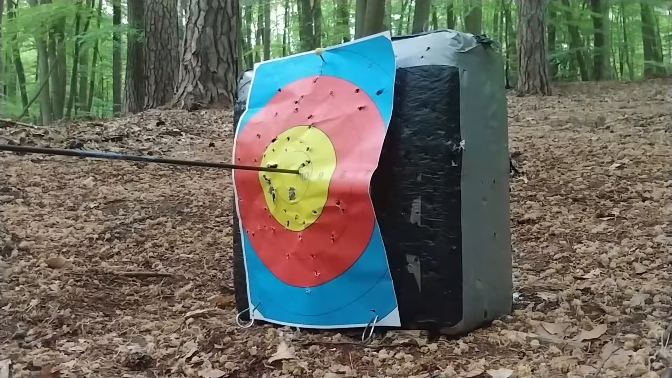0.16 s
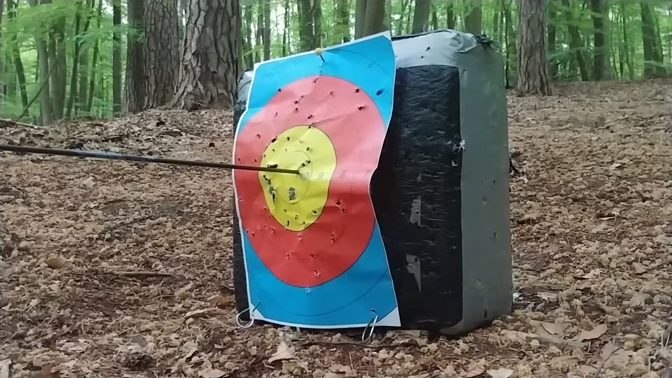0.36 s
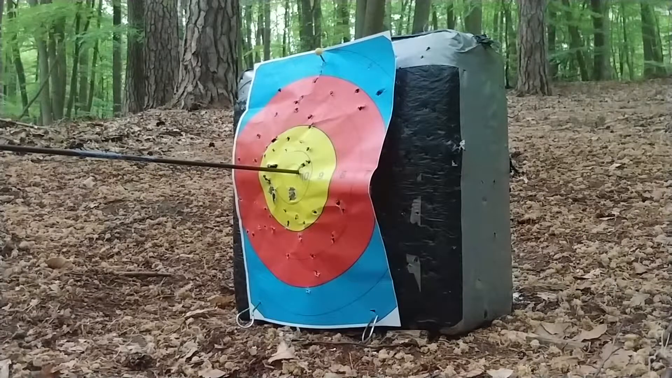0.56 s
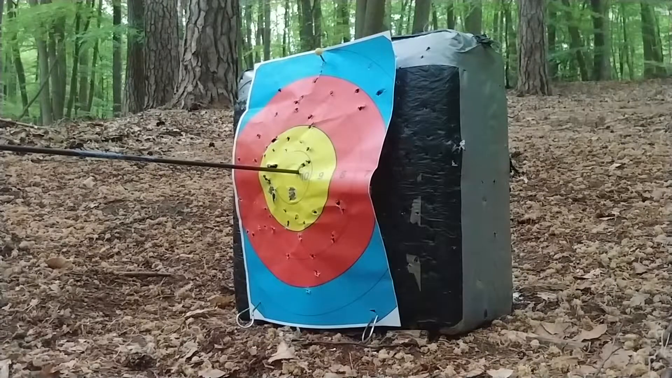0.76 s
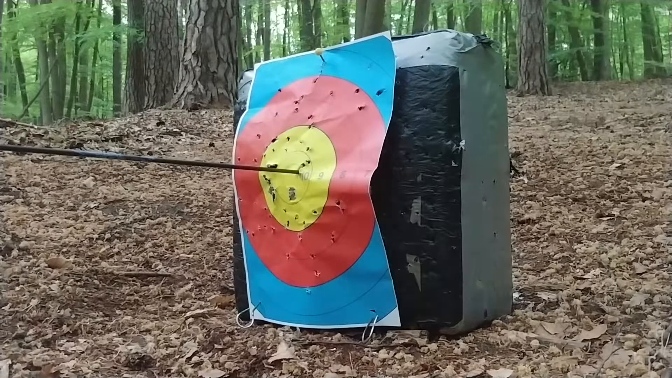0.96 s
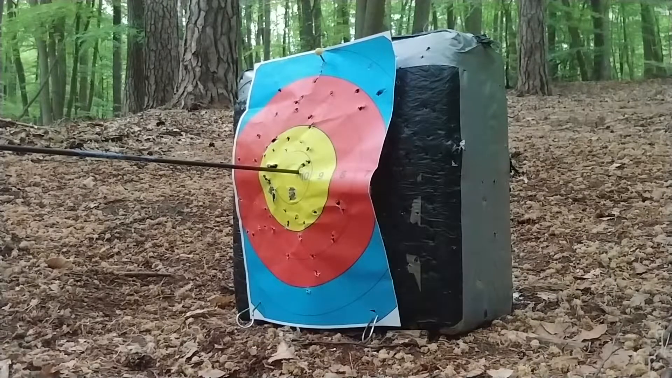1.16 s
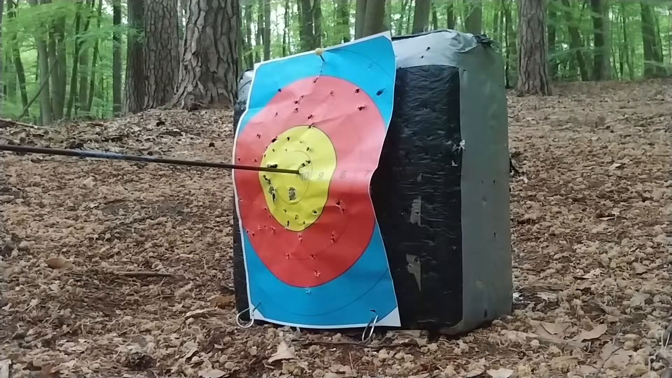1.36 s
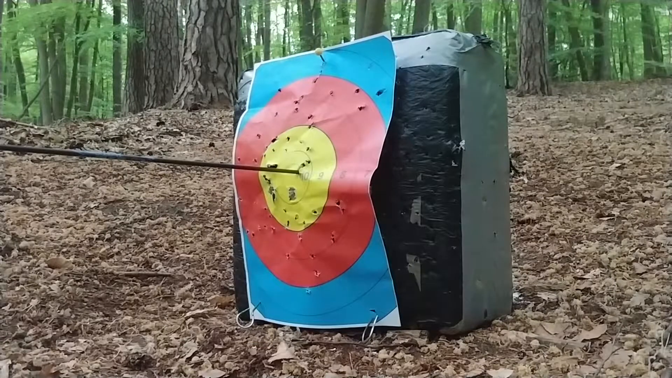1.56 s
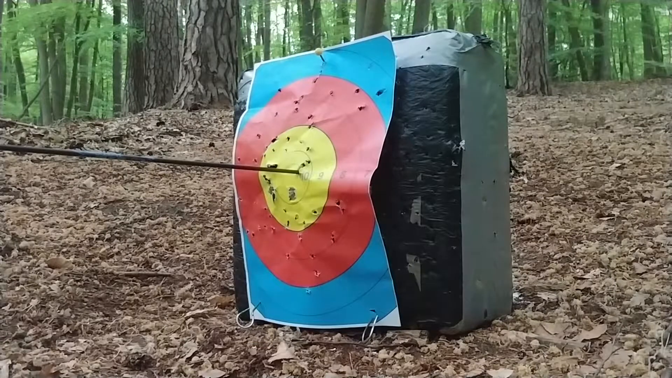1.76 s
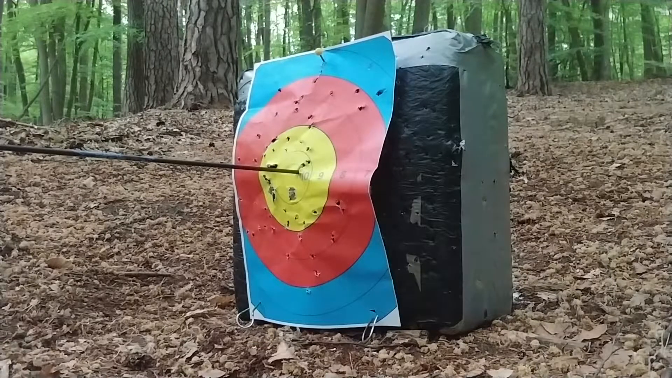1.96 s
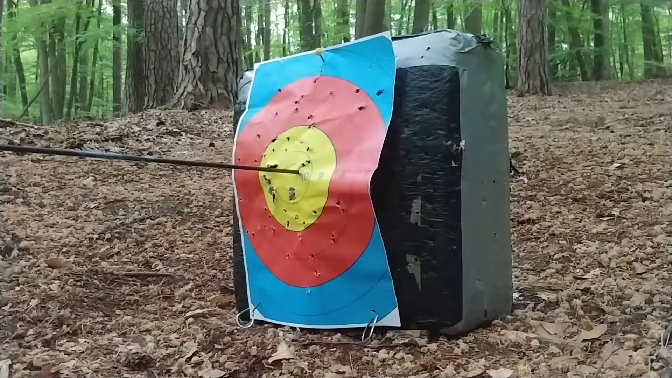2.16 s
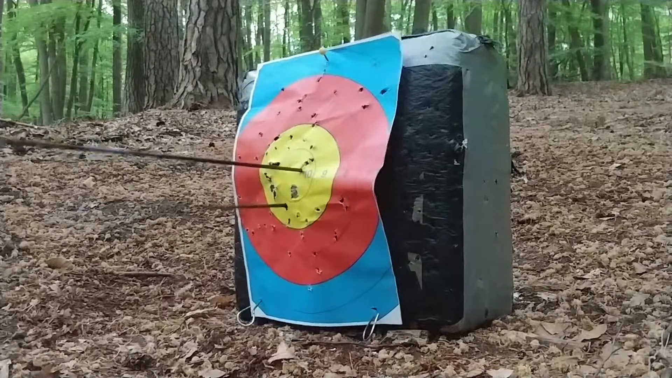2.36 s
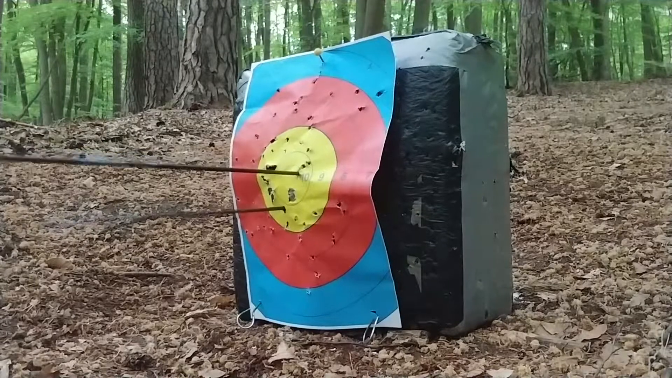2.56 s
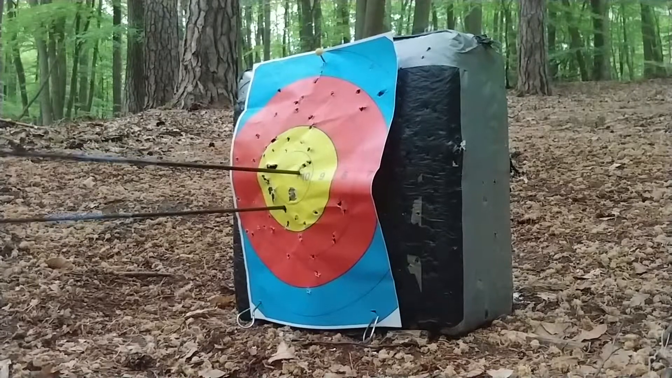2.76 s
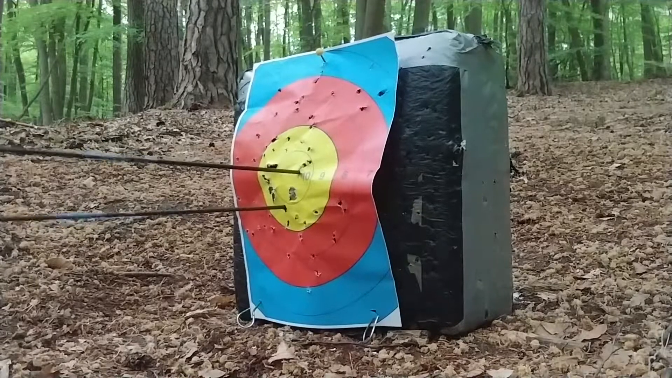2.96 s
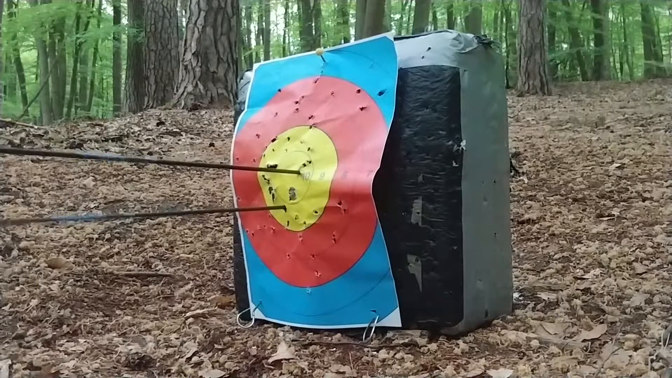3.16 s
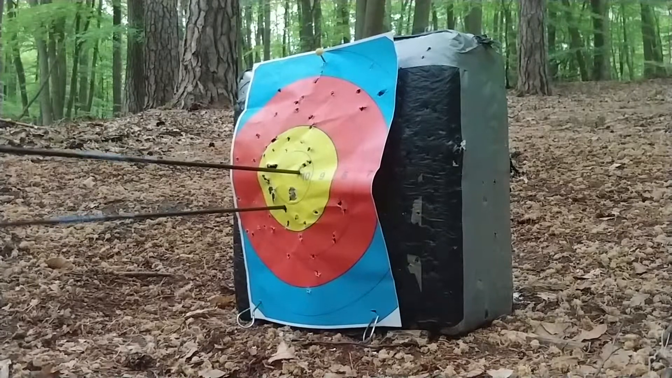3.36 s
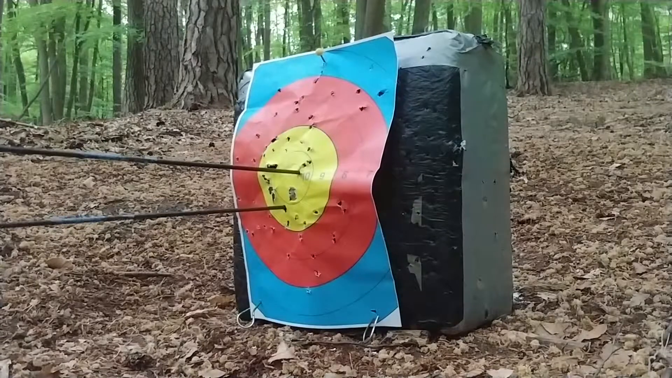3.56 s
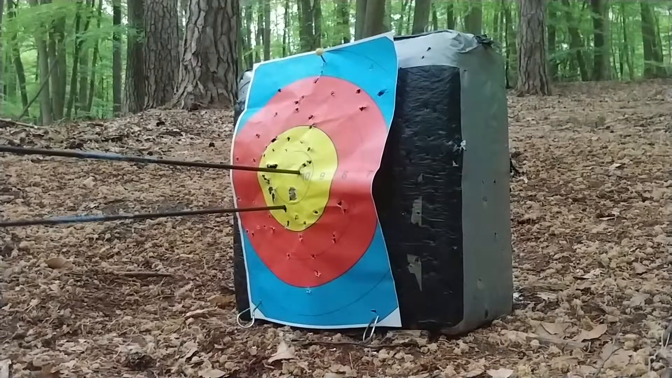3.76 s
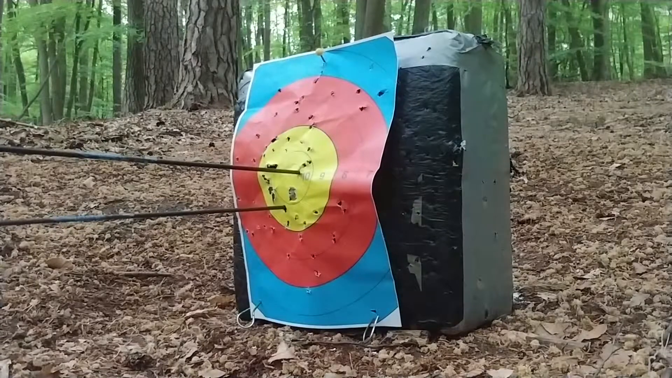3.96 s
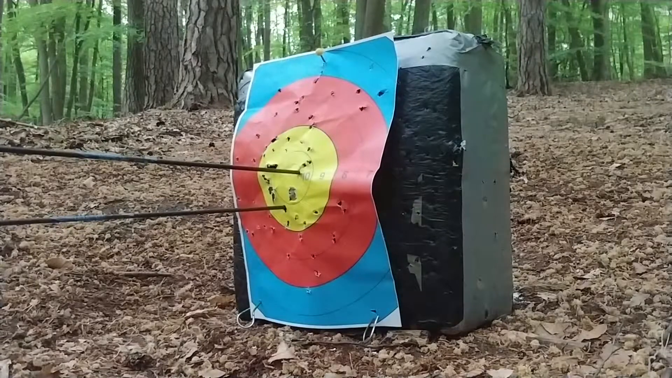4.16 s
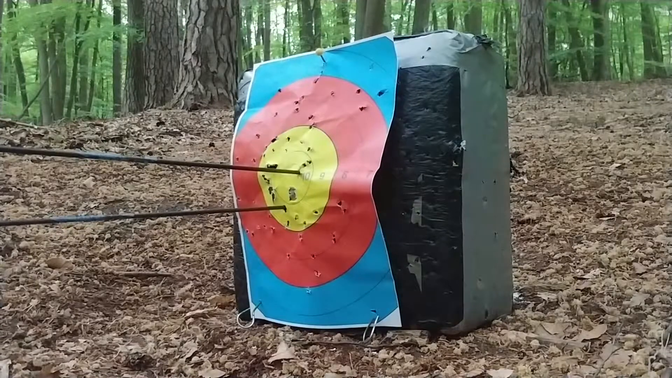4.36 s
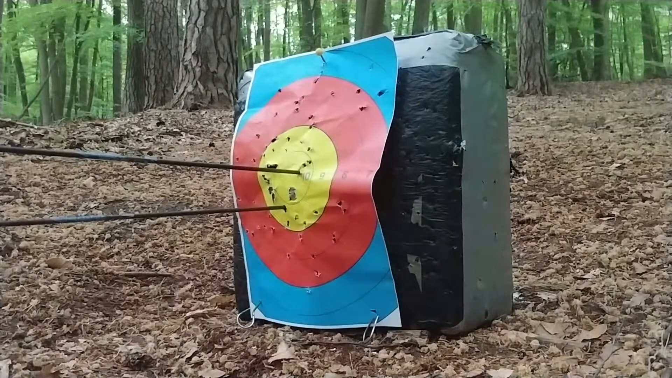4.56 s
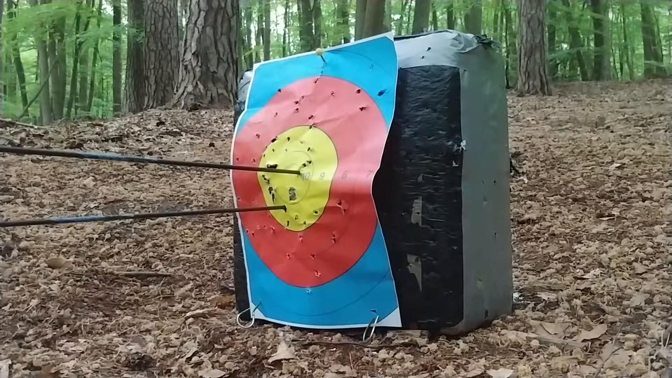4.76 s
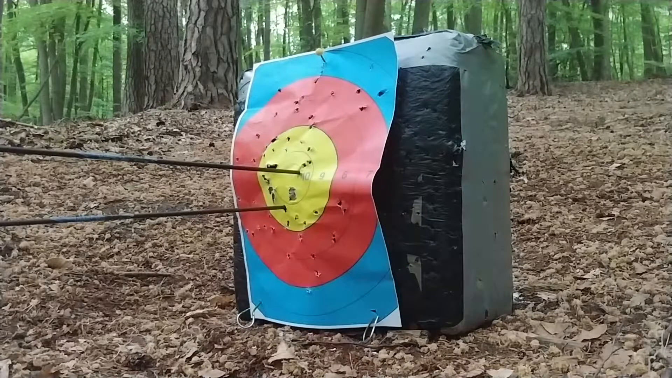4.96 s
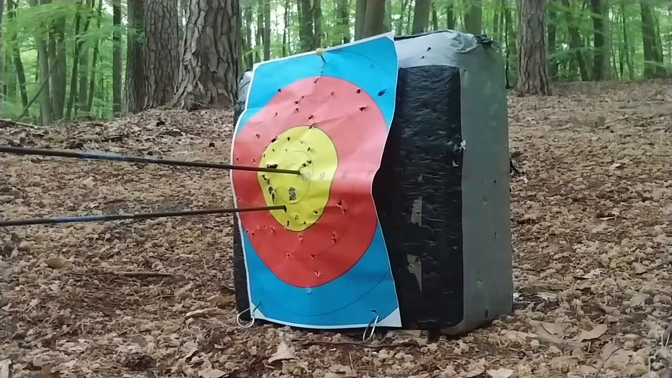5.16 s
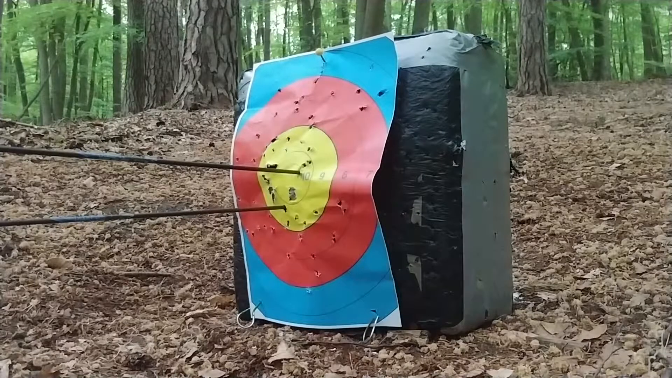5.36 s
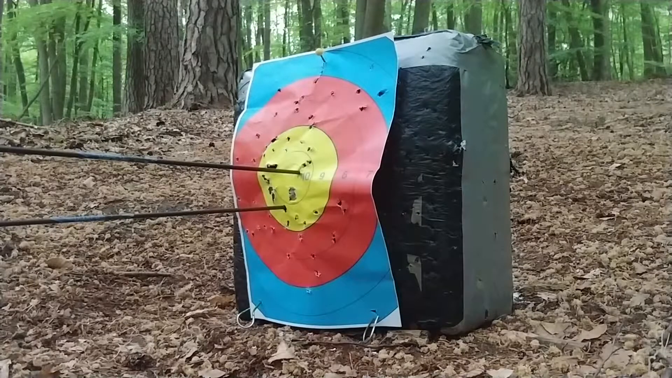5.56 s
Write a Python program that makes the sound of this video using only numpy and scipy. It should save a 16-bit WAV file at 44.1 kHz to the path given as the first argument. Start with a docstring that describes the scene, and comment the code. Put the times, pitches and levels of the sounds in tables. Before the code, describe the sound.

Birdsong over soft traffic rumble; a distant bowstring clack, a quick rising hiss, and a sharp, loud arrow thwack into a foam block.

```python
"""In a forest a bow is loosed some way off; the arrow hisses in and smacks into a foam block close by.
A distant road is filtered noise; birds are gliding tones with the trunks' diffuse, dying tail.
Bow and block are decaying modes set ringing by short blows; the flight is noise that swells with nearness.
Gain control ducks the whole sound when it is loud, most at the smack, and lets it creep back."""
import sys
import numpy as np
from scipy import signal
from scipy.io import wavfile
from scipy.ndimage import uniform_filter1d

SR = 44100
rng = np.random.default_rng(int(sys.argv[2]) if len(sys.argv) > 2 else 0)


def bounce(signal):
    """Save signal as a 16-bit WAV file at the path given by the first command-line argument."""
    frames = np.transpose(np.atleast_2d(signal))
    limited = np.clip(frames, -1, 1)
    pcm = np.round(limited * 32767).astype(np.int16)
    wavfile.write(sys.argv[1], SR, pcm)


N = 246959


def from_db(db):
    """The decibel law: 20 dB is a factor of ten in amplitude."""
    return 10 ** (np.asarray(db) / 20)


def rms_one(x):
    """Normalisation to unit root-mean-square amplitude."""
    return x / np.sqrt(np.mean(x ** 2) + 1e-20)


def filtered(x, order, hz, kind="low"):
    """Butterworth filtering: a maximally flat pass band."""
    return signal.sosfilt(signal.butter(order, hz, kind, fs=SR, output="sos"), x)


def in_time(rows):
    """Linear interpolation in time of every column after the first."""
    s, *columns = np.transpose(rows)
    return [np.interp(np.arange(N) / SR, s, column) for column in columns]


def at_hz(points, hz):
    """Interpolation along a logarithmic frequency axis."""
    point_hz, value = np.transpose(points)
    return np.interp(np.log(hz), np.log(point_hz), value)


def drift(rate_hz):
    """Random fluctuation of unit spread: noise through two equal poles, made at a fortieth of the sample rate."""
    step = 40
    r = np.exp(-2 * np.pi * rate_hz * step / SR)
    white = rng.standard_normal(N // step + 2002)
    slow = signal.lfilter([1], [1, -2 * r, r * r], white)[2000:]   # past the filter's start
    return np.interp(np.arange(N) / step, np.arange(len(slow)), rms_one(slow))


def placed(x, pan_db, lead_ms):
    """Interaural differences: louder by pan_db and earlier by lead_ms on the left."""
    right = np.interp(np.arange(N) - lead_ms * SR / 1000, np.arange(N), x)
    return np.array([x * from_db(pan_db / 2), right * from_db(-pan_db / 2)])


def struck(times_s, blow_db, modes, sign, soft_hz, scrape_s=0):
    """Modal synthesis: blows, low-passed by the softness of contact, excite damped resonances."""
    blows = np.full(N, 1e-18)
    blows[(np.array(times_s) * SR).astype(int)] = sign * from_db(blow_db)
    if scrape_s:   # a scraping contact is a short dying burst of noise
        r = np.exp(-1 / (scrape_s * SR))
        blows = signal.lfilter([np.sqrt(1 - r * r)], [1, -r], blows) * rng.standard_normal(N)
    blows = filtered(blows, 2, soft_hz)
    ringing = 0
    for hz, level_db, t60_s in modes:
        r = from_db(-60 / (t60_s * SR))
        w = 2 * np.pi * hz / SR
        gain = from_db(level_db) * np.sin(w)
        ringing = ringing + signal.lfilter([0, gain], [1, -2 * r * np.cos(w), r * r], blows)
    return ringing


def forest(x):
    """Diffuse reverberation: trunks scatter a dense dying tail, different in each ear, and leaves dull it."""
    t60_s, scatter_s, leaf_cut_hz = 0.49, .01, 7600
    t = np.arange(SR) / SR
    build_up = np.clip(t / scatter_s, 0, 1)
    tail = rng.standard_normal((2, SR)) * from_db(-60 * t / t60_s) * build_up
    tail = filtered(tail, 1, leaf_cut_hz)
    unit_energy = tail / np.sqrt(np.sum(tail ** 2) / 2)
    return signal.fftconvolve(x[None], unit_energy, axes=1)[:, :N]


def road():
    """Partly coherent band noise: a rumble from a fixed side, a tyre roar moving leftwards, a narrow drone."""
    # the road in time: start_s, rumble_db, roar_db, drone_db, roar_left_lead_ms
    traffic = [(0, -43, -42.5, -51, 0.041), (.9, -44, -39.5, -49, 0.039), (1.8, -43, -38.5, -49, 0.032),
               (2.7, -42.5, -38, -49.5, 0.22), (3.6, -41.5, -39, -57.5, 0.3),
               (4.6, -42, -39.5, -58.5, 0.41), (5.6, -44, -43.5, -60.5, 0.48)]
    # relative spectral density of the noise: hz, level_db
    colour = [(15, -20), (25, -18), (59, 4), (178, -12), (214, -15), (244, -20.5), (342, -17), (694, -15.5),
              (925, 2), (1270, -7.5), (2080, -5), (5070, -34.5), (7310, -52.5), (11400, -47), (14000, -49)]
    # level difference between the ears: hz, left_minus_right_db
    balance = [(30, -17), (60, 0.5), (150, 1.5), (380, 3), (950, 0), (2380, 0), (5980, -4.5), (15000, 3.5)]
    # share of power common to both ears: hz, likeness (0 to 1)
    likeness = [(25, 0.36), (45, 0.97), (100, 0.93), (250, 0.8), (600, 0.58), (1000, 0.052), (2000, 0.36),
                (4000, 0.51), (8000, 0.054)]
    rumble_top_hz, rumble_lead_ms = 700, .3
    drone_hz, drone_width_hz = 209.6, 14.8
    rumble_db, roar_db, drone_db, lead_ms = in_time(traffic)

    white = rng.standard_normal((2, 3, N))   # two sets, so that neighbouring bands are independent
    fixed = [placed(w[0], 0, rumble_lead_ms) for w in white]
    delay = np.round(lead_ms * SR / 1000).astype(int)
    delayed = np.clip(np.arange(N) - delay, 0, N - 1)
    moving = [np.array([w[0], w[0][delayed]]) for w in white]

    layers = [0, 0]   # rumble, roar
    edges = 22 * 2 ** np.arange(0, 9.4, 1 / 3)   # third octaves, Hz
    for k, (low, high) in enumerate(zip(edges, edges[1:])):
        hz = np.sqrt(low * high)
        above = int(hz > rumble_top_hz)
        common = (fixed, moving)[above][k % 2]
        alike = np.clip(at_hz(likeness, hz), 0, 1)
        pair = np.sqrt(alike) * common + np.sqrt(1 - alike) * white[k % 2, 1:]
        band = filtered(pair, 2, [low, high], "band")
        tilt_db = at_hz(balance, hz) / 2 * np.array([[1], [-1]])
        level_db = at_hz(colour, hz) + tilt_db + 1.41 * drift(4.1)
        layers[above] = layers[above] + band * from_db(level_db)
    rumble, roar = (rms_one(layer) for layer in layers)

    drone_edges = [drone_hz - drone_width_hz / 2, drone_hz + drone_width_hz / 2]
    drone = rms_one(filtered(rng.standard_normal(N), 2, drone_edges, "band"))
    drone = placed(from_db(drone_db) * drone, 0, rumble_lead_ms)
    return from_db(rumble_db) * rumble + from_db(roar_db) * roar + drone


def notes(rows, rough, rough_rate, warble_hz=0, warble_rate=0):
    """Frequency modulation: tones glide through three pitches; leaves and air make a share of power flutter."""
    out = np.zeros(N + SR)
    wobble = drift(28.0)   # radians of random phase in the warble
    for s, length_s, *pitch_hz, level_db in rows:
        u = np.linspace(0, 1, int(length_s * SR))
        at = int(s * SR)
        span = slice(at, at + len(u))
        hz = np.polyval(np.polyfit([0, .5, 1], pitch_hz, 2), u)
        hz += warble_hz * np.sin(2 * np.pi * warble_rate * length_s * u + wobble[span])
        tone = np.sin(2 * np.pi * np.cumsum(hz) / SR)
        envelope = np.sin(np.pi * u) ** 0.5
        out[span] += from_db(level_db + 2.5) * envelope * tone
    share = np.clip(rough, 0, 1)
    return out[:N] * (np.sqrt(1 - share) + np.sqrt(share) * drift(rough_rate))


def sung(calls, figure):
    """Superposition of a motif: the figure's notes at every call time, levels added in dB."""
    return [(s + after, length, a, b, c, db + note_db)
            for s, db in calls for after, length, a, b, c, note_db in figure]


def chorus(count=1600):
    """Diffuse superposition: many short random slurs blur into a haze heard only through the forest tail."""
    # gain of the haze: start_s, level_db
    haze = [(0, -61.5), (.6, -60), (1.3, -61), (2.6, -49.5), (3.6, -55.5), (4.2, -57), (4.8, -73),
            (5.6, -68)]
    low_hz, high_hz, slur_s = 3346, 5174, .025
    rows = []
    for when, height, slope, loudness in rng.random((count, 4)):
        hz = low_hz + (high_hz - low_hz) * height ** 1.4
        start_hz = hz * (1.16 - .32 * slope)
        end_hz = hz * (.84 + .32 * slope)
        rows.append((when * (N / SR - .1), slur_s, start_hz, hz, end_hz, 5 * loudness))
    level_db, = in_time(haze)
    return forest(from_db(level_db) * rms_one(notes(rows, 0.51, 100)))


def birds():
    """Direct and reverberant sound: each kind of call has its side and its share of forest tail."""
    # call times: start_s, level_db
    chips = [(.132, -58.5), (.352, -57), (.657, -56.5), (1.402, -55), (1.637, -53), (4.277, -58),
             (4.428, -57.5), (4.493, -55), (4.668, -55), (4.94, -53.5)]
    pips = [(2.445, -46), (2.478, -52), (2.502, -38.5), (2.54, -49), (2.566, -42), (2.587, -47),
            (2.625, -45), (2.655, -44), (2.672, -43), (2.69, -41), (2.72, -45), (2.75, -38), (2.83, -42),
            (2.87, -57), (2.905, -52)]
    warbles = [(1.762, -53.5), (2.003, -49), (2.207, -46)]
    upsweeps = [(1.612, -55.5), (1.854, -47), (2.092, -46.5)]
    twitters = [(3.573, -50), (3.645, -45.5)]
    # held whistles of several birds: start_s, length_s, start_hz, end_hz, level_db
    whistles = [(0.02, 0.54, 3830, 3660, -68), (0.966, 0.084, 4980, 5030, -59),
                (1.045, 0.12, 5130, 5040, -67), (2.55, 0.069, 5000, 5160, -69),
                (2.596, 0.032, 5020, 5000, -56), (2.672, .09, 4940, 5040, -72),
                (2.93, 0.17, 7430, 7000, -65.5), (4.922, 0.11, 4960, 5010, -57.5),
                (5.0, 0.322, 5060, 5150, -72)]
    # notes of one call: after_s, length_s, start_hz, middle_hz, end_hz, level_db (added to the call's)
    chip = [(0, .011, 4700, 6950, 8070, -2.5)]
    pip = [(0, .018, 4140, 4135, 4110, 0)]
    slur = [(.012, 0.036, 6110, 5600, 5050, -3), (.042, 0.015, 4480, 4890, 5070, -4),
            (.058, .014, 4100, 4500, 4950, 2.5), (.078, .012, 4040, 4430, 5000, 2.5)]
    upsweep = [(0.002, 0.0097, 4240, 4700, 5250, -3), (0.01, 0.014, 5080, 5800, 6430, 1.5),
               (0.023, 0.012, 6340, 6800, 7100, -8.5)]
    twitter = [(0, 0.0061, 4140, 5630, 6800, -0.5), (.008, 0.0099, 6940, 8340, 9560, -10.5),
               (.015, 0.006, 9600, 8600, 7300, -11), (0.017, 0.0131, 7560, 6700, 6360, -3)]
    held = [(s, length, a, (a + b) / 2, b, db) for s, length, a, b, db in whistles]
    singers = [   # sound, pan_db, wet_db
        (notes(sung(chips, chip), 0.089, 250), .1, 4),
        (notes(held, .1, 60), 1.8, 4),
        (notes(sung(pips, pip), .1, 60), 2, -4),
        (notes(sung(warbles, slur), 0.28, 300, warble_hz=150, warble_rate=160), 7, 5),
        (notes(sung(upsweeps, upsweep), 0.15, 260), 8, 3),
        (notes(sung(twitters, twitter), .3, 280), 4, 2.5)]
    direct = sum(placed(x, pan_db, 0) for x, pan_db, wet_db in singers)
    wet = sum(x * from_db(wet_db) for x, pan_db, wet_db in singers)
    return direct + forest(wet)


def finch():
    """Acoustic shadowing: the recorder's body sends a finch's high notes to the left, low ones to the right."""
    # times of the repeated figure: start_s, level_db
    repeats = [(2.803, -35), (2.946, -35), (3.08, -34), (3.207, -34.5), (3.336, -35), (3.462, -34.5)]
    # its five notes: after_s, length_s, start_hz, middle_hz, end_hz, level_db (added to the repeat's)
    figure = [(-.013, 0.0106, 5230, 4800, 4260, -6), (-.002, 0.0115, 4430, 5360, 5670, -10),
              (0.012, 0.0154, 3480, 4003, 4800, 6.5), (.027, .007, 4700, 4100, 3600, -1),
              (0.032, 0.026, 3690, 2974, 2510, 5)]
    # notes that end the song: start_s, length_s, start_hz, middle_hz, end_hz, level_db
    flourish = [(3.731, 0.021, 3240, 2930, 2530, -42), (3.781, 0.022, 2540, 3180, 3830, -32.5),
                (3.799, 0.024, 3680, 4400, 4860, -37), (3.825, 0.03, 4850, 4600, 4100, -44),
                (3.848, 0.036, 4134, 3140, 2600, -37), (4.073, 0.011, 3850, 5110, 5960, -39.5),
                (4.085, 0.0085, 5800, 5000, 3500, -45)]
    flutter, shadow_hz, lead_ms = .03, 4150, .12
    song = notes(sung(repeats, figure), flutter, 150)
    ending = notes(flourish, flutter, 183)
    wet = from_db(-7) * song + from_db(-1) * ending
    heard = placed(song + ending, 0, lead_ms) + forest(wet)
    left = filtered(heard[0], 4, shadow_hz, "high")
    right = filtered(heard[1], 4, shadow_hz)
    return np.array([left, right]) + from_db(-47) * heard   # a little bends round to both


def bow(swish_db=-44):
    """Impulsive excitation: string slaps ring scratchy ticks and limb thuds, with a short swish of air."""
    # string slaps at the release: start_s, tick_db, thud_db, limb_kick (+1 or -1)
    slaps = [(2.0113, -46, -29.5, -1), (2.0151, -44, -31, -1), (2.0223, -29, -34, 1),
             (2.0248, -39, -23.5, 1), (2.0299, -29, -25, -1), (2.0341, -24, -39, 1),
             (2.0369, -47, -25.5, -1), (2.0427, -22.5, -37, 1), (2.0505, -36, -35, -1),
             (2.058, -47, -46, 1)]
    # modes of the tick: pitch_hz, level_db, t60_s
    tick_modes = [(3000, -6, .006), (3700, -4.5, 0.019), (4450, -5, 0.0055), (5400, -13, 0.0042),
                  (6200, -25, .004), (7500, -5, 0.0035), (7920, 2, 0.0074), (8600, -12, 0.004),
                  (11800, -7, 0.007)]
    # modes of the limbs' thud: pitch_hz, level_db, t60_s
    thud_modes = [(109, -29, 0.044), (151, -11, 0.065), (215, -10, 0.042), (290, -17.5, 0.016),
                  (394, -7, 0.031), (525, -4, 0.016), (757, -5, 0.031), (903, -11, 0.026),
                  (1060, -8.5, 0.038)]
    s, tick_db, thud_db, kick = np.transpose(slaps)
    ticks = struck(s, tick_db, tick_modes, 0.82, soft_hz=11900, scrape_s=.0007)
    thuds = struck(s, thud_db, thud_modes, np.sign(kick), soft_hz=1810)
    air = rms_one(filtered(rng.standard_normal((2, N)), 1, [500, 9000], "band"))
    swell = np.exp(-((np.arange(N) / SR - 2.032) / 0.019) ** 2)
    swish = from_db(swish_db) * swell * air
    wet = from_db(-13.5) * ticks + from_db(-12.5) * thuds
    return placed(ticks + thuds, -1.4, 0) + swish + forest(wet)


def flight_db():
    """Distance law: from the release the hiss swells as the arrow nears; after the hit it dies exponentially."""
    release_s, hit_s = 2.03, 2.303
    arrow_m_per_s, pass_m, vane_db = 44, 0.37, -34.5
    vane_beam = 1.33   # the hiss falls faster than 1 / distance by this power
    shiver_t60_s = 0.036   # the paper shivers on after the hit
    t = np.arange(N) / SR
    nearing_db = -20 * vane_beam * np.log10(np.hypot(1, arrow_m_per_s * (hit_s - t) / pass_m))
    dying_db = -60 * (t - hit_s) / shiver_t60_s
    return vane_db + np.where(t < hit_s, nearing_db, dying_db) - 100 * (t < release_s)


def vane_hiss():
    """Turbulence noise: the vanes' hiss is band-passed noise under the flight's level."""
    hiss = filtered(rng.standard_normal((2, N)), 3, [4200, 9500], "band")
    return from_db(flight_db()) * rms_one(hiss)


def impact():
    """Modal impact: soft pushes ring the foam block, sharp blows crack its paper face, which is on the left."""
    # tip dents the face, breaks through, block rebounds: start_s, push_db, crack_db, push_softness_hz
    blows = [(2.2918, -32, -61, 190), (2.2957, -23.5, -61, 190), (2.29896, -18.5, -47, 150),
             (2.30262, -40, -3, 560), (2.30266, -14.5, -40, 560), (2.3031, -40, -11, 560),
             (2.3048, -11.5, -30, 243), (2.30974, -14.5, -50, 150)]
    # modes of the foam block: pitch_hz, level_db, t60_s
    block_modes = [(191, 3, 0.055), (273, 11, 0.024), (458, 7.5, 0.014), (613, 17, 0.013), (840, 5, 0.016)]
    # modes of the paper face: pitch_hz, level_db, t60_s
    face_modes = [(1226, -7.5, 0.013), (1800, -15, 0.0074), (2040, -30, 0.0057), (2920, -22, 0.0091),
                  (3150, -3, 0.013), (4800, -5.5, 0.0053), (5400, -4, 0.0049), (6000, -9.5, 0.0081),
                  (7050, -4, 0.0031), (8400, -6, 0.0033), (14500, -21, 0.002)]
    s, push_db, crack_db, soft_hz = np.transpose(blows)
    push = sum(struck([at], db, block_modes, -1, hz) for at, db, hz in zip(s, push_db, soft_hz))
    push = filtered(push, 2, 96, "high")   # too small to radiate deep bass
    crack = struck(s, crack_db, face_modes, -1, soft_hz=6500)
    dull = filtered(crack, 2, 2200)
    bright = crack - dull   # shadowed more on the right than the dull part
    close = placed(push, 2.7, 0.04) + placed(dull, 0.88, 0.023) + placed(bright, 5.9, 0.052)
    return close + from_db(-16.0) * forest(crack) + from_db(-23.0) * forest(push)


def scene():
    """Linear superposition of all sources."""
    return road() + chorus() + birds() + finch() + bow() + vane_hiss() + impact()


def gain_control(x, threshold_db=-24, share=0.78, attack_s=0.016, release_s=0.54):
    """Dynamic compression: level above the threshold cuts the gain quickly; the cut dies away exponentially."""
    power = uniform_filter1d(np.mean(x ** 2, axis=0), size=256)
    excess_db = 10 * np.log10(power + 1e-12) - threshold_db
    cut_db = share * np.maximum(excess_db, 1e-3)
    t = np.arange(N) / SR / release_s
    held_db = np.exp(np.maximum.accumulate(np.log(cut_db) + t) - t)   # a peak hold that leaks
    r = np.exp(-1 / (attack_s * SR))
    return x * from_db(-signal.lfilter([1 - r], [1, -r], held_db))


def record(dry):
    """Band limiting and saturation: bass is lost, gain controlled, peaks rounded, treble rolled off and cut."""
    left = filtered(dry[0], 1, 99, "high")   # the left microphone loses more bass, and leads there
    heard = gain_control(filtered(np.array([left, dry[1]]), 2, 31.2, "high"))
    rounded = heard / (1 + np.abs(heard / 1.05) ** 6) ** (1 / 6)
    rolled = filtered(rounded, 6, 10720)
    return signal.sosfilt(signal.cheby2(12, 70, 16500, fs=SR, output="sos"), rolled)


dry = scene()
out = record(dry)
bounce(out)
```